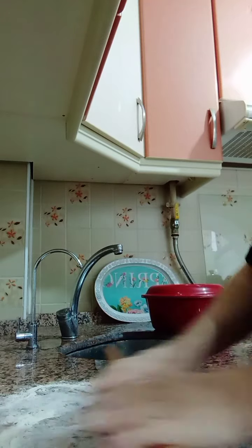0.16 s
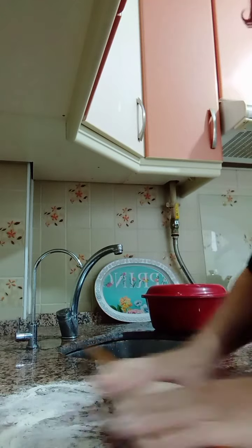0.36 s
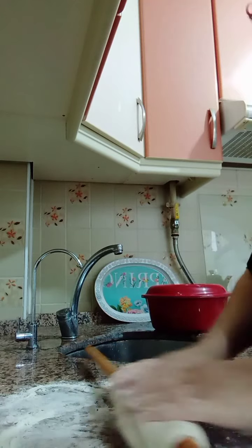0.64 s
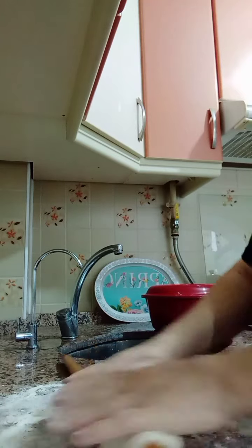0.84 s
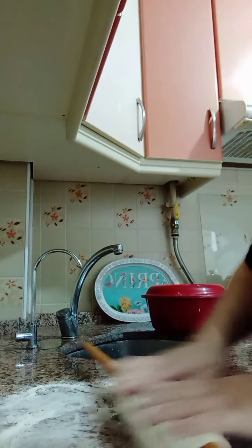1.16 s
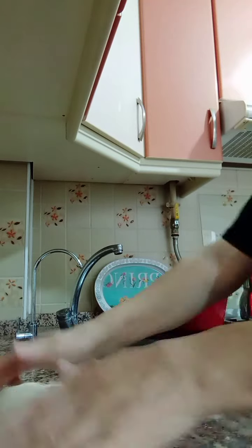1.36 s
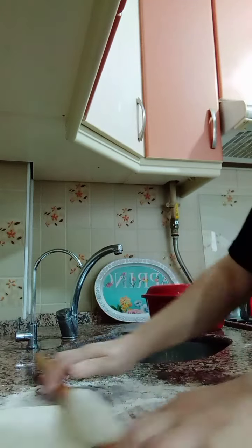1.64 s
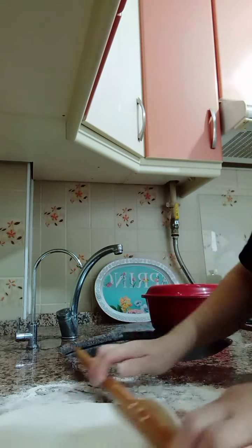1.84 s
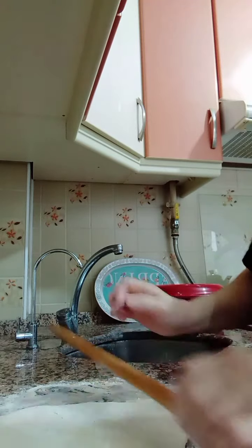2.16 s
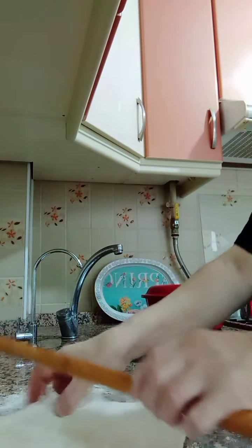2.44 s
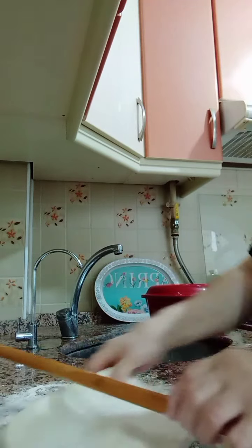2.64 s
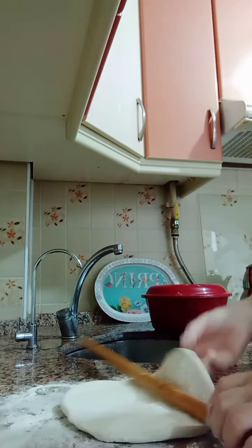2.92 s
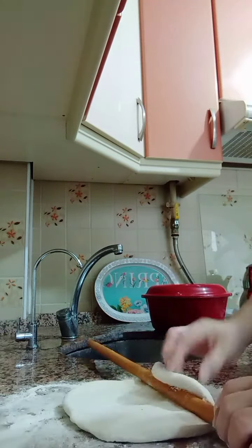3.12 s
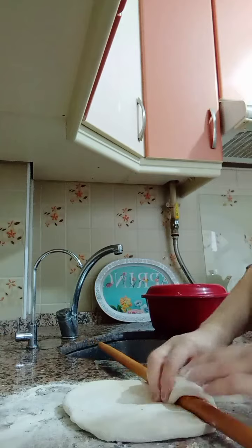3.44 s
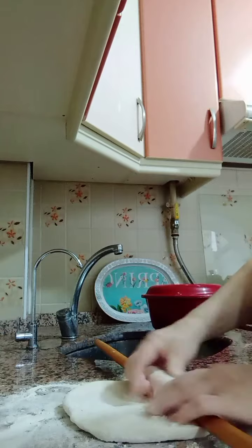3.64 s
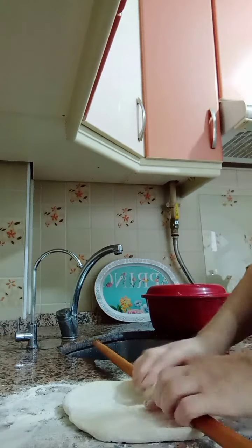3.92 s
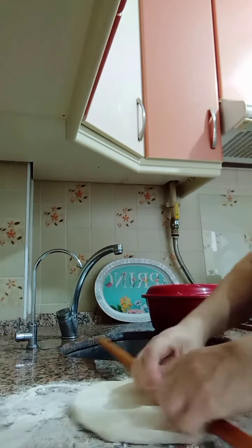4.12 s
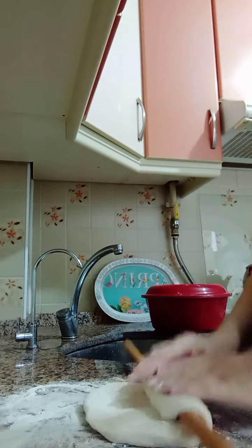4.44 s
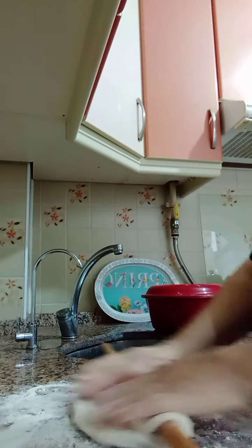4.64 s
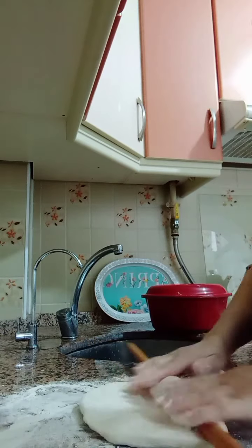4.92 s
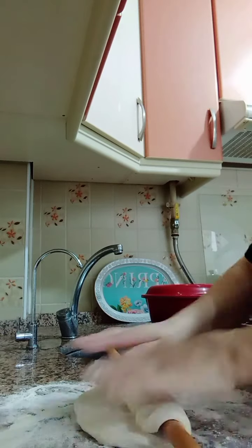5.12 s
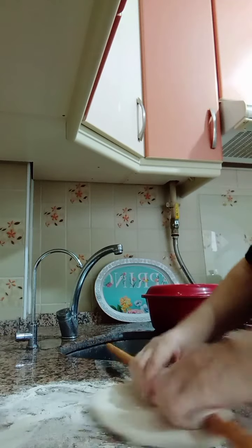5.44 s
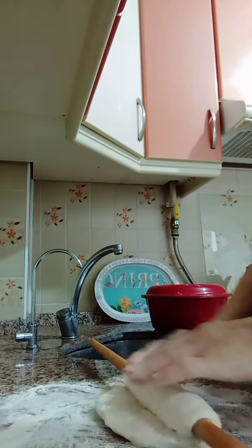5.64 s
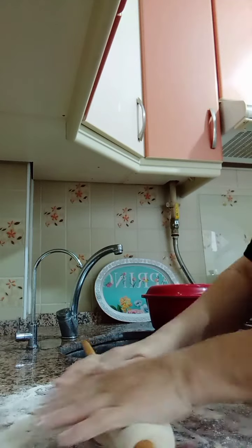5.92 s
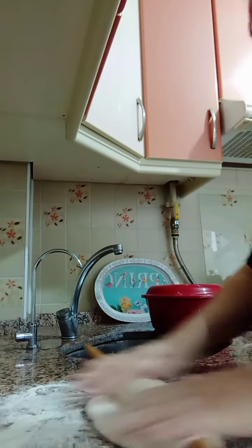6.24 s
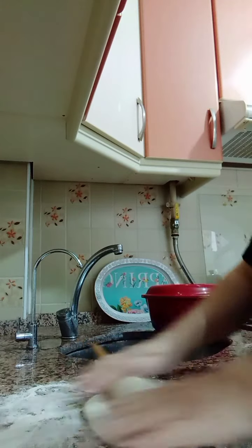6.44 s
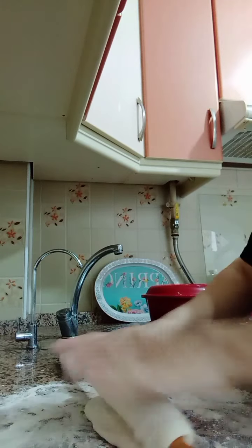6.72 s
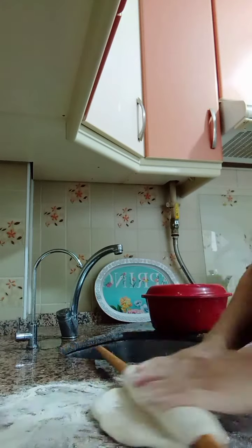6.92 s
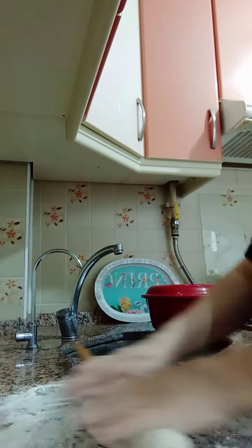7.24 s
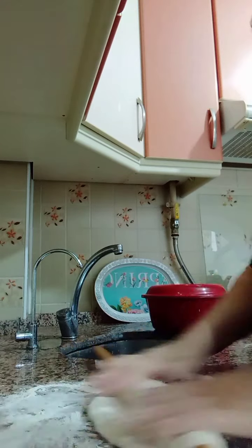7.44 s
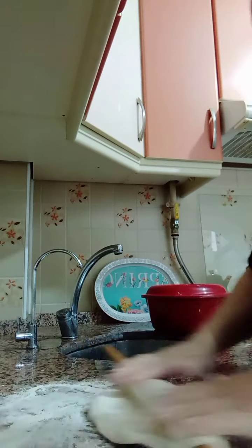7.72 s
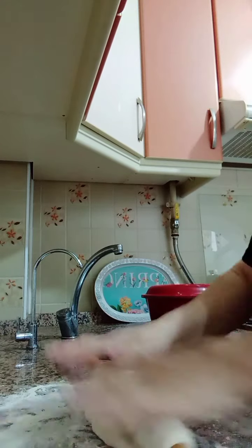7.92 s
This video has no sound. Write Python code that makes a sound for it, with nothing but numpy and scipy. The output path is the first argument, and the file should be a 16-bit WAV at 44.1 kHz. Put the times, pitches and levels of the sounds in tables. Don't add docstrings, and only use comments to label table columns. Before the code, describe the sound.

A thin wooden rolling pin works stiff dough: rhythmic floury swishes, sharp clacks on a stone counter, soft pats, quiet room hum.

```python
import sys
import numpy as np
from scipy import signal
from scipy.fft import rfft, irfft, next_fast_len
from scipy.io import wavfile
from scipy.ndimage import uniform_filter1d, map_coordinates

SR = 44100
rng = np.random.default_rng(int(sys.argv[2]) if len(sys.argv) > 2 else 0)


def transcribe(u):
    v = np.clip(np.atleast_2d(u).T, -1, 1)
    q = np.round(v * 32767).astype(np.int16)
    wavfile.write(sys.argv[1], SR, q)


def ratio_of_db(decibels):
    return 10 ** (np.asarray(decibels, float) / 20)


N = 355887


def unit(x):
    return x / np.sqrt(np.mean(x ** 2) + 1e-20)


def along(points, hz):
    f, v = np.transpose(points)
    return np.interp(np.log(hz + 1), np.log(f + 1), v)


def wobble(rate_hz):
    knots = rng.standard_normal(int(N * rate_hz / SR) + 4)
    return map_coordinates(knots, [np.arange(N) * rate_hz / SR])


def filtered(x, response):
    m = next_fast_len(len(x) + 8192)
    return irfft(rfft(x, m) * response(np.fft.rfftfreq(m, 1 / SR)), m)[:len(x)]


def contact_lowpass(hz, edge_hz, damping):
    return (1 + 1j * damping * hz / edge_hz - (hz / edge_hz) ** 2) ** -2


def blurred_sine(hz, t, blur):
    return np.sin(2 * np.pi * hz * t + blur * np.cumsum(rng.standard_normal(len(t))))


def scrape(spectrum, grit_db, patchy_db):
    grains = rng.standard_normal(N) * ratio_of_db(grit_db * wobble(1000))
    z = signal.stft(grains, nperseg=512)[2]
    patches = uniform_filter1d(rng.standard_normal(z.shape), size=6, axis=0)
    patches = unit(uniform_filter1d(patches, size=8, axis=1))
    x = signal.istft(z * ratio_of_db(patchy_db * patches), nperseg=512)[1][:N]
    low_end, high_end = (spectrum[0][0] * .9, -60), (spectrum[-1][0] * 1.05, -60)
    closed = [low_end, *spectrum, high_end]
    return unit(filtered(x, lambda hz: ratio_of_db(along(closed, hz))))


def rubbing():
    flour_gain, dough_gain, skin_gain = strokes()
    return sliding(flour_gain, dough_gain, skin_gain) + pin_body(dough_gain)


def strokes():
    # (start [s], length [s], flour hiss [dB], dough drag over hiss [dB], skin sheen over hiss [dB])
    first_rolling = [
        (-0.14, 0.35, -56.0, -4.5, -29),
        (0.16, 0.25, -61, -6, -26.0),
        (0.395, 0.24, -62.5, -7.5, -26.5),
        (0.598, 0.26, -59, -4.5, -21),
        (0.841, 0.19, -59.5, -8, -29.5),
        (1.008, 0.35, -66, -1, -27.0),
        (1.216, 0.2, -51.5, -11.5, -26.0),
        (1.424, 0.3, -57, -6.5, -30),
        (1.64, 0.37, -52.5, -12, -25.5),
        (1.966, 0.22, -52.5, -15.5, -24.5),
    ]
    handling = [(2.194, 0.35, -64, -1, -32), (2.444, .16, -55.5, -6.5, -22),
                (2.573, 0.44, -54.5, -6, -26.5), (2.741, 0.096, -49, -17, -35),
                (2.86, 0.28, -60, -10.5, -22.5), (3.187, .1, -65.5, -7, -20), (3.272, 0.19, -72, -8, -23),
                (3.542, .144, -71, -12, -21), (3.646, .13, -64.5, -13.5, -17),
                (3.741, .17, -65.5, -16, -20), (3.94, 0.21, -67, -11, -21.5),
                (4.15, 0.21, -57.5, -5.5, -28), (4.33, 0.084, -63, -9, -24), (4.412, 0.27, -70, -12, -18)]
    second_rolling = [(4.601, 0.083, -60.5, -6, -21), (4.646, 0.23, -54.0, -10, -31),
                      (4.84, 0.23, -62.5, -6, -26.5), (5.044, 0.16, -55, -13.5, -23),
                      (5.341, 0.2, -60, -16, -24), (5.49, 0.15, -51.5, -6.5, -38),
                      (5.597, 0.097, -53.5, -10.5, -25.5), (5.729, 0.14, -69.5, -20, -18),
                      (5.79, 0.31, -54.5, -16.5, -23.5), (6.056, 0.21, -56.0, -13, -28.0),
                      (6.251, 0.2, -57.5, -10, -22), (6.467, 0.22, -61.5, -9, -27.5),
                      (6.633, 0.157, -60.0, -12.5, -23.5), (6.848, 0.27, -62, -16, -19),
                      (7.066, 0.2, -56, -15.5, -23.5), (7.254, 0.219, -56.5, -9.5, -30.5),
                      (7.48, 0.204, -56.5, -6.5, -29), (7.63, 0.22, -58.5, -8, -32.5),
                      (7.882, 0.14, -59.5, -16.5, -21)]
    # (flour hiss [dB], dough drag [dB], skin sheen [dB])
    resting_db = (-76, -78, -100)
    rows = np.vstack([first_rolling, handling, second_rolling])
    start_s, length_s, hiss_db, drag_db, sheen_db = rows.T[:, :, None]
    t = np.arange(0, N + 64, 64) / SR
    phase = np.clip((t - start_s) / length_s, 0, 1) ** 0.9
    speed = np.abs(np.sin(np.pi * phase))
    layers = [(hiss_db, 1.07), (hiss_db + drag_db, 0.73), (hiss_db + sheen_db, 1.17)]
    gains = []
    for (level_db, speed_power), rest_db in zip(layers, resting_db):
        moving = np.linalg.norm(ratio_of_db(level_db) * speed ** speed_power, axis=0)
        gains.append(np.interp(np.arange(N) / SR, t, np.hypot(moving, ratio_of_db(rest_db))))
    return gains


def sliding(flour_gain, dough_gain, skin_gain):
    # (frequency [Hz], density [dB per Hz])
    flour_spectrum = [(2000, -40.5), (3400, -10), (3700, -6), (4090, -4), (4770, -1), (5350, 2.5),
                      (6750, -10), (8040, -29.5), (12000, -36), (15600, -67), (22000, -120)]
    dough_spectrum = [(600, -1), (1000, -5.5), (1600, -2.5), (2400, 2.5), (3800, 0), (4600, -6.5)]
    skin_spectrum = [(5290, -38.5), (9000, -9.5), (11900, -13), (12900, -7.5), (14100, -1), (15100, 4.5),
                     (15900, 2.5)]
    hiss = ratio_of_db(1.5) * flour_gain * scrape(flour_spectrum, grit_db=0.5, patchy_db=2.23)
    drag = ratio_of_db(5.5) * dough_gain * scrape(dough_spectrum, grit_db=1.5, patchy_db=2.5)
    sheen = ratio_of_db(3.0) * skin_gain * scrape(skin_spectrum, grit_db=1.5, patchy_db=4.0)
    return ratio_of_db(1.1 * wobble(25)) * (hiss + drag + sheen)


def pin_body(dough_gain):
    # (frequency [Hz], density [dB per Hz])
    body_spectrum = [(250, -40.5), (420, -7.5), (579, -3.5), (1110, -5.5), (1700, -18.5), (2210, -42.5),
                     (3740, -120)]
    rest_db, over_drag_db = -72, -3.5
    gain = np.hypot(ratio_of_db(rest_db), ratio_of_db(over_drag_db) * dough_gain)
    return gain * scrape(body_spectrum, grit_db=-1.5, patchy_db=2.75)


def knocks():
    # (time [s], peak [dB], hardness [dB], ring [dB], chatter [s])
    pin_knocks = [
        (.1612, -25, -14, -6.5, 0.081),
        (.5968, -4.5, 2.5, -31, 0.0081),
        (.5999, -2, 10.5, -32, 0.0021),
        (1.1802, -13.5, -8, -10.5, 0.043),
        (4.8052, -13.5, -17.5, -10, 0.047),
        (4.8665, -37, 7, -22, 0.016),
        (5.1584, -7, -3, -16.5, 0.023),
        (5.1675, -10, -7.5, -19.5, 0.035),
        (6.2772, -13, -32.5, -12, 0.046),
        (8.0691, -30.5, -9.5, 3.5, .02),
    ]
    # (frequency [Hz], level [dB], t60 [s])
    pin_modes = [(171.3, -18, 0.34), (449.6, -7.5, 0.18), (598, -12, 0.12), (665.6, -2.5, 0.098),
                 (823, -9, 0.16), (1102.5, 0, 0.12), (1520, 1, 0.057), (2140, -4, 0.055),
                 (2585, -1.5, 0.076), (3073, -5, 0.055), (3685, -5, 0.089), (4480, -7, .06),
                 (5200, -11, 0.04)]
    return strikes(pin_knocks, pin_modes, thin=0.24, blur=0.073, late=0.3, room_db=-11)


def tip_clacks():
    # (time [s], peak [dB], hardness [dB], ring [dB], chatter [s])
    down_clacks = [
        (1.3932, -4.5, -3, -24, 0.026),
        (5.3322, -37.5, 7, -36, 0.015),
        (6.8712, -40.5, 13, -34, 0.03),
    ]
    # (frequency [Hz], level [dB], t60 [s])
    tip_modes = [(455, -9, .12), (982, 0, .15), (1430, -1, 0.27), (1505, -2, .2), (1926, -1, 0.25),
                 (2555, 1, 0.2), (3170, -2, 0.16), (3790, 0, 0.16), (4480, -2.5, 0.18), (5305, -2.5, 0.17),
                 (5960, 1, .17)]
    return strikes(down_clacks, tip_modes, thin=0.287, blur=0.041, late=1.9, room_db=-9)


def lifted_clacks():
    # (time [s], peak [dB], hardness [dB], ring [dB], chatter [s])
    raised_clacks = [
        (2.0606, -5, 6, -29, 0.013),
        (2.0636, -8, 7, -27.5, 0.022),
    ]
    # (frequency [Hz], level [dB], t60 [s])
    raised_modes = [(446, 1.5, 0.047), (722, -10, 0.068), (1044, -2.5, 0.076), (1868, 4.5, .16),
                    (3180, 3, .2), (3980, -1, 0.15), (4460, 1, 0.18), (5430, 0.5, .18), (6100, -1.5, .15)]
    return strikes(raised_clacks, raised_modes, thin=0.24, blur=0.045, late=1.1, room_db=-10.5)


def strikes(rows, modes, thin, blur, late, room_db):
    out, t = np.zeros(N + SR), np.arange(SR // 2) / SR
    for time_s, peak_db, hard_db, ring_db, chatter_s in rows:
        edge_hz = 7000 * ratio_of_db(hard_db / 2)

        def dull(hz):
            return contact_lowpass(hz, edge_hz, damping=1.5)

        def radiated(hz):
            return dull(hz) * 1j * hz / (thin * edge_hz + 1j * hz)

        bounces = rng.standard_normal(len(t)) * ratio_of_db(3.5 * rng.standard_normal(len(t)))
        chatter = 0.5 * bounces * ratio_of_db(-60 * (t / chatter_s) ** 1.91)
        grip = ratio_of_db(min(hard_db, 0) * 0.2)
        ring = np.zeros(len(t))
        for hz, level_db, t60_s in modes:
            decay = ratio_of_db(level_db + rng.normal(0, 0.55) - 60 * t / (grip * t60_s))
            ring += decay * blurred_sine(hz, t, blur)
        ring = filtered(ratio_of_db(ring_db) * ring * (1 - np.exp(-t / 0.001)), dull)
        snap = filtered(np.linalg.norm(chatter) * (t == 0), radiated)
        room_gain = ratio_of_db(room_db + 0.3 * max(hard_db, -12))
        room = room_gain * kitchen(snap + 1.44 * ring, late)
        hit = filtered(chatter, radiated) + ring + room
        out[round(time_s * SR):][:len(t)] += ratio_of_db(peak_db + 4.5) * hit
    return out[:N]


def pats():
    # (time [s], peak [dB], pitch [Hz], t60 [s],
    # puff [dB])
    pats_and_thuds = [(1.488, -45.5, 256, 0.046, 2.5), (2.445, -40, 288, 0.073, -9.5),
                      (2.511, -46, 204, 0.059, -11), (2.765, -43.5, 293, 0.09, -0.5),
                      (3.206, -33.5, 742, 0.07, -19), (3.66, -61, 340.7, 0.07, -5),
                      (4.246, -36.5, 741, 0.1, -9), (6.039, -40.5, 562, 0.032, -20),
                      (6.38, -48.5, 600, 0.067, -7), (6.871, -51.5, 353, 0.092, -2.5),
                      (.62, -49, 119.3, .4, -20), (1.44, -48, 140, .2, -14), (2.08, -50, 150, 0.19, -15),
                      (4.27, -52, 171, 0.23, -15), (4.82, -48, 170, 0.26, -14)]
    out, t = np.zeros(N + SR), np.arange(SR // 2) / SR
    for time_s, peak_db, hz, t60_s, puff_db in pats_and_thuds:
        note = blurred_sine(hz, t, blur=0.014) + 0.17 * blurred_sine(1.52 * hz, t, blur=0.019)
        note = note * ratio_of_db(-60 * t / t60_s)
        counter = 0.16 * blurred_sine(445, t, blur=0.014) * ratio_of_db(-60 * t / 0.19)
        puff = filtered(4 * rng.standard_normal(len(t)), lambda f: contact_lowpass(f, 1100, damping=1.4))
        puff = puff * ratio_of_db(-60 * t / 0.21)
        blow = (note + counter + ratio_of_db(puff_db) * puff) * (1 - np.exp(-t / 0.0018))
        heard = blow + ratio_of_db(-17.5) * kitchen(blow, late=0.22)
        out[round(time_s * SR):][:len(t)] += ratio_of_db(peak_db + 8.5) * heard
    return out[:N]


def kitchen(x, late):
    # (frequency [Hz], t60 [s])
    room_t60 = [(200, 0.45), (1000, 0.32), (3000, 0.33), (6000, 0.27), (7300, 0.21), (8600, 0.24),
                (16000, 0.11)]
    hz, t, z = signal.stft(rng.standard_normal(SR // 2), SR, nperseg=256)
    far_wall = 1 + late * np.clip((t - 0.035) / 0.01, 0, 1)
    build = (1 - np.exp(-t / 0.0049)) * far_wall
    decay = ratio_of_db(-60 * t / along(room_t60, hz)[:, None])
    tail = signal.istft(z * decay * build, SR, nperseg=256)[1]
    return signal.fftconvolve(x, tail / np.linalg.norm(tail))[:len(x)]


def microphone(x):
    # (frequency [Hz], gain [dB])
    mic_response = [(40, -15), (100, -4), (500, -8), (2000, -6.5), (4000, 0), (5500, 3.5), (6500, -4.5),
                    (7500, -19), (9500, -37), (16000, -46.5)]
    size = 2048
    gain = ratio_of_db(along(mic_response, np.fft.rfftfreq(size, 1 / SR)))
    cepstrum = irfft(np.log(gain), size)
    cepstrum[1:size // 2] *= 2
    cepstrum[size // 2 + 1:] = 0
    impulse = irfft(np.exp(rfft(cepstrum)), size)
    return signal.fftconvolve(x, impulse)[:N]


def leaning():
    # (time [s], handling rumble [dB], counter drone [dB])
    lean = [(0, -74, -70.5), (.75, -68, -68.5), (1.0, -77.5, -66), (1.7, -69, -72), (2.5, -63.5, -68),
            (2.8, -75, -66.5), (3.3, -67, -70.5), (3.8, -77.5, -69), (4.2, -67.5, -68), (5.0, -76, -70),
            (5.4, -79, -67.5), (6.1, -76, -71.5), (6.45, -79, -63.5), (7.1, -76.5, -64.5),
            (7.5, -80, -68.5), (8.07, -84, -72)]
    # (frequency [Hz], density [dB per Hz])
    rumble_spectrum = [(25, -30), (40, -5), (50, 6.5), (80, -12), (100, -28)]
    drone_spectrum = [(290, -10.5), (340, 1), (400, -13)]
    time_s, rumble_db, drone_db = np.transpose(lean)
    t = np.arange(N) / SR
    rumble = ratio_of_db(np.interp(t, time_s, rumble_db)) * scrape(rumble_spectrum, grit_db=-2.5, patchy_db=0.1)
    drone = ratio_of_db(np.interp(t, time_s, drone_db)) * scrape(drone_spectrum, grit_db=-4.5, patchy_db=1.5)
    return rumble + drone


def hum():
    # (frequency [Hz], width [Hz], level [dB])
    room_modes = [(110.6, 13, 5.5), (178.8, 8.5, 1.5), (224, 21, -3.5), (400, 62, -10.5)]

    def resonances(f):
        total = 0
        for k, (center_hz, width_hz, db) in enumerate(room_modes):
            damping = 1j * f * width_hz
            total = total + (-1) ** k * ratio_of_db(db) * damping / (center_hz ** 2 - f * f + damping)
        return total

    level_db = -62 + 1.3 * wobble(1.26) + 0.5 * wobble(8.7)
    return ratio_of_db(level_db) * unit(filtered(rng.standard_normal(N), resonances))


def quiet_air():
    # (frequency [Hz], density [dB per Hz])
    air_spectrum = [(260, -33.5), (450, -0.5), (879, -4), (1720, -4), (4080, -7.5), (5410, -3.5),
                    (6370, -7.5), (8210, -26), (13400, -52), (15800, -22)]
    return ratio_of_db(-66.5 - 4.0) * scrape(air_spectrum, grit_db=2.5, patchy_db=-2.0)


def scene():
    top_hz = 15790
    noises = filtered(rubbing() + leaning() + quiet_air(), lambda hz: hz < top_hz)
    contacts = knocks() + tip_clacks() + lifted_clacks() + pats()
    return (noises + microphone(contacts) + hum())[None]


def top_cut(x):
    return signal.sosfilt(signal.butter(12, 16970, fs=SR, output="sos"), x)


def record(dry):
    return top_cut(dry)


dry = scene()
out = record(dry)
transcribe(out)
```